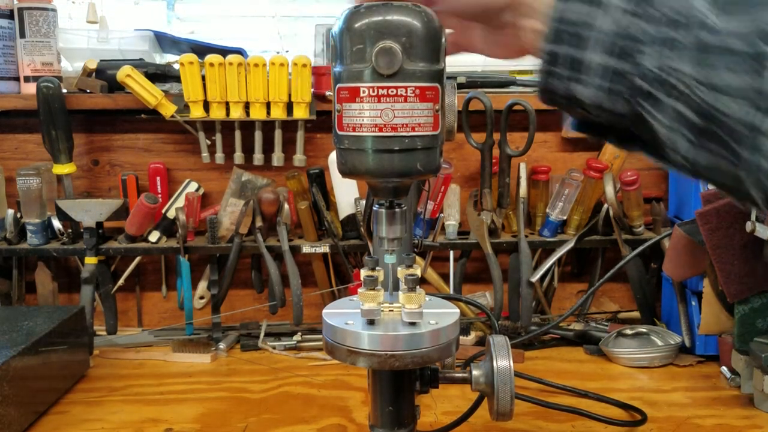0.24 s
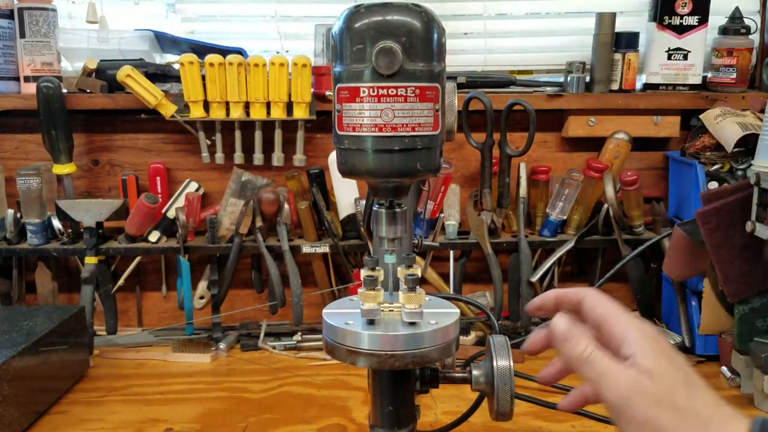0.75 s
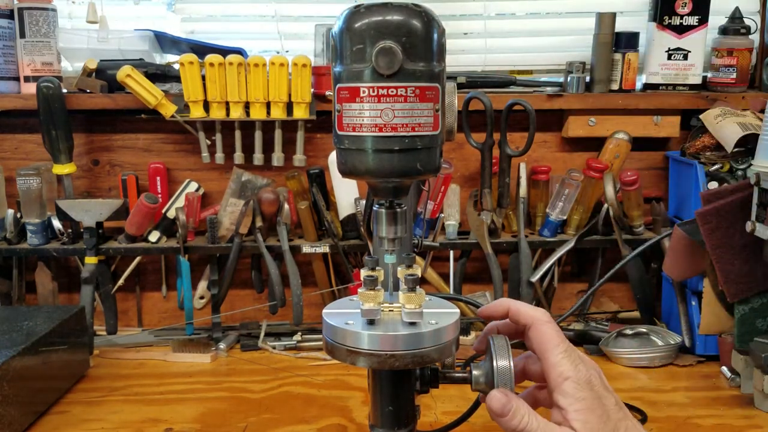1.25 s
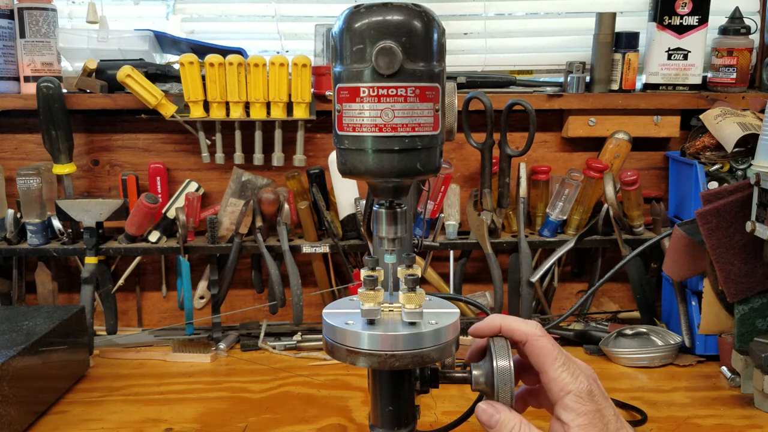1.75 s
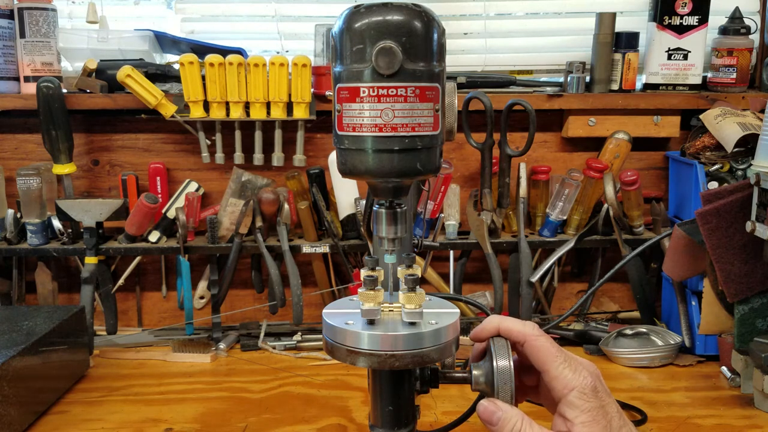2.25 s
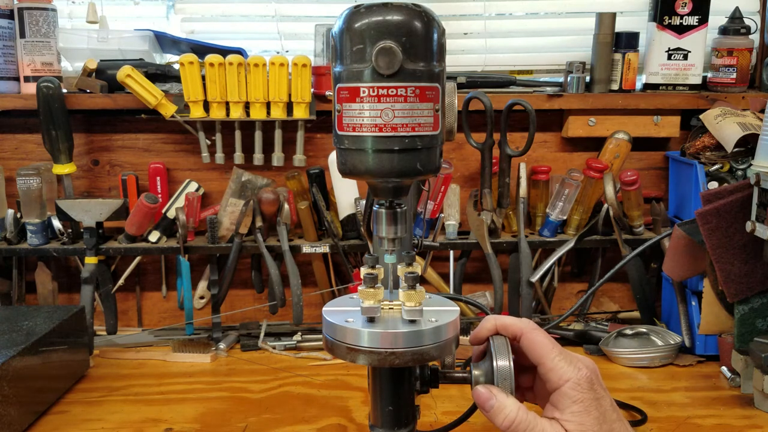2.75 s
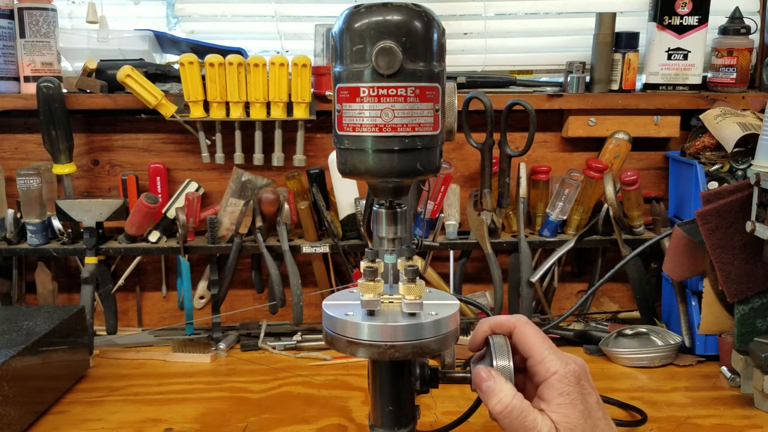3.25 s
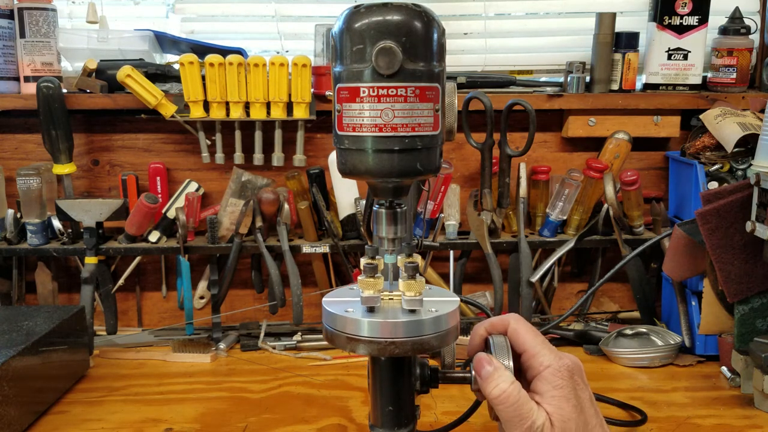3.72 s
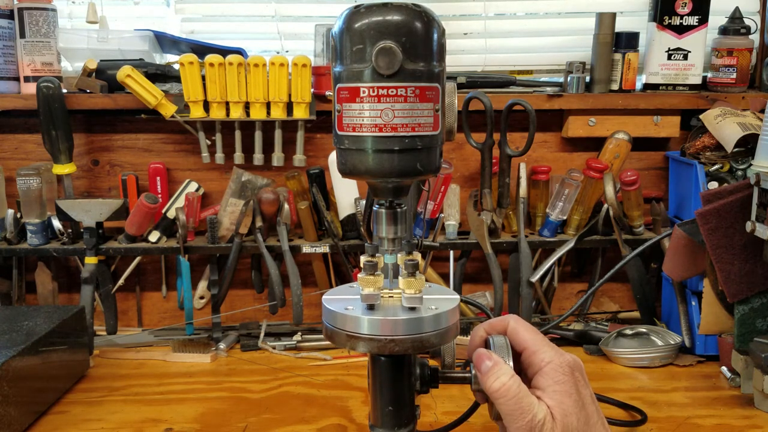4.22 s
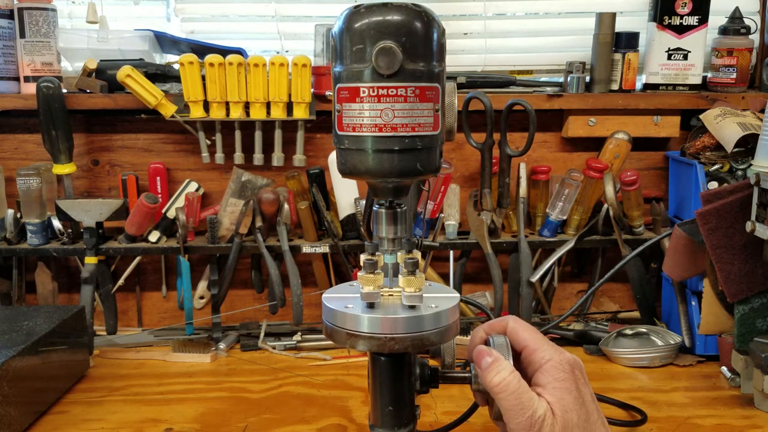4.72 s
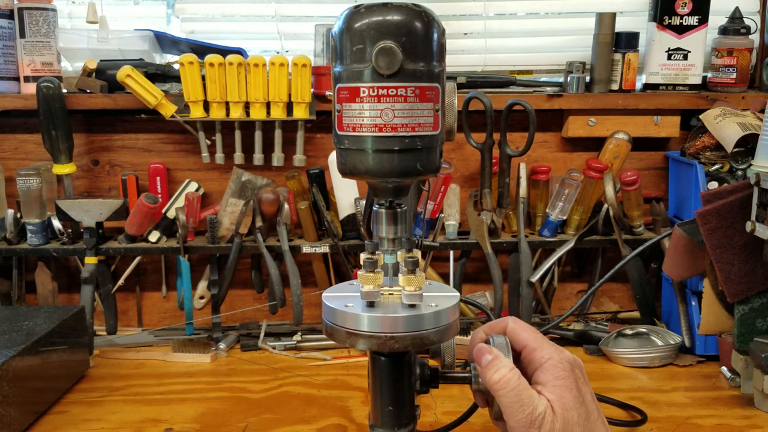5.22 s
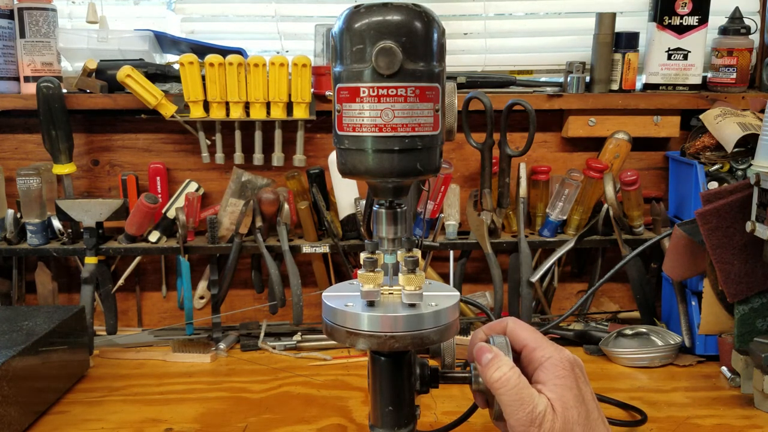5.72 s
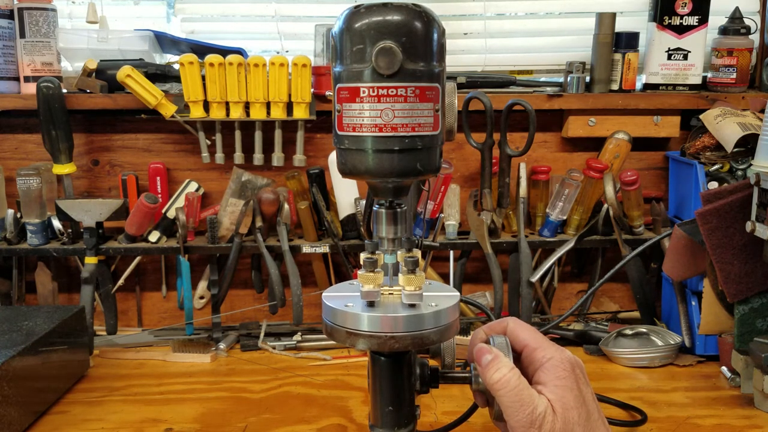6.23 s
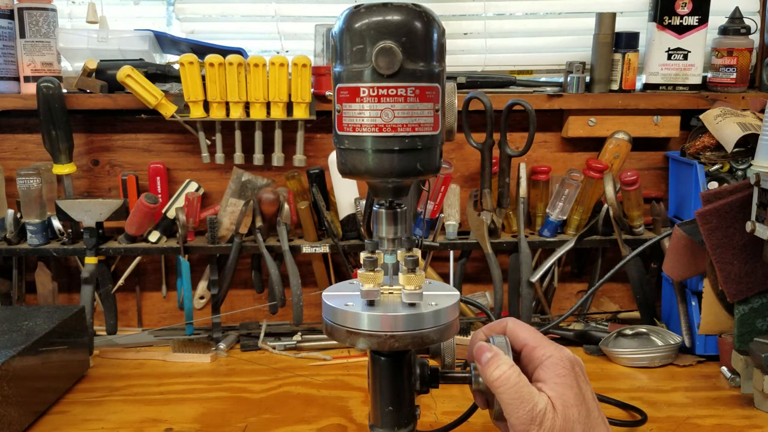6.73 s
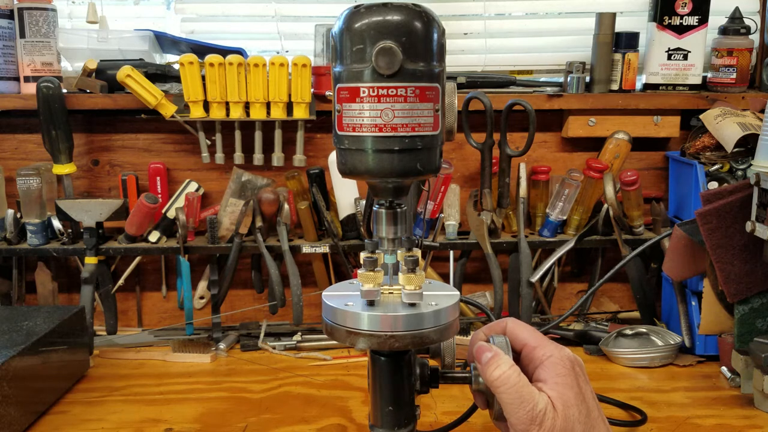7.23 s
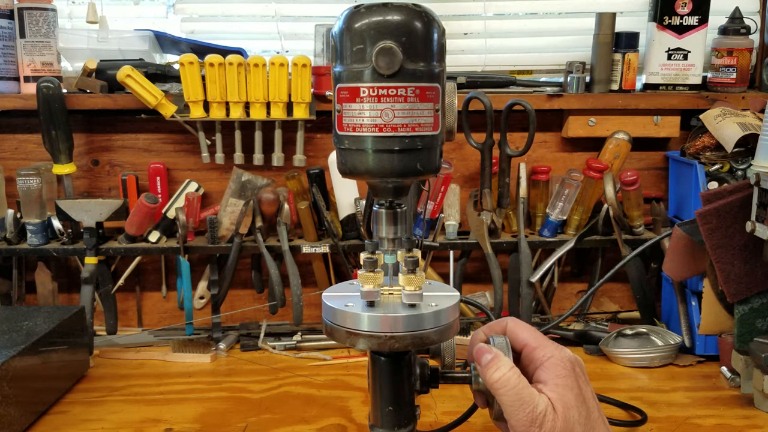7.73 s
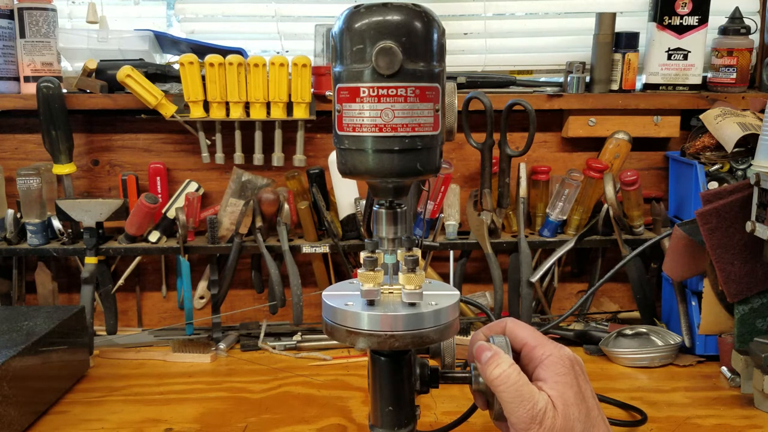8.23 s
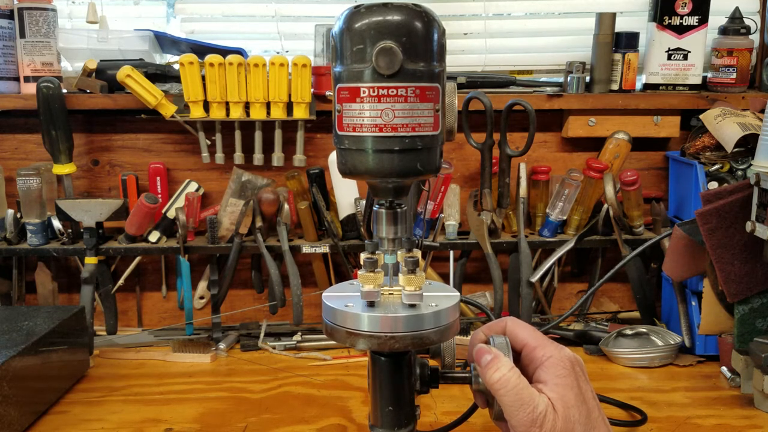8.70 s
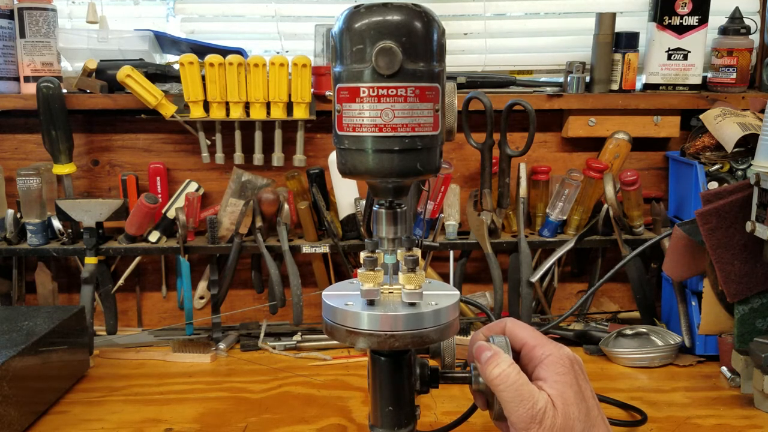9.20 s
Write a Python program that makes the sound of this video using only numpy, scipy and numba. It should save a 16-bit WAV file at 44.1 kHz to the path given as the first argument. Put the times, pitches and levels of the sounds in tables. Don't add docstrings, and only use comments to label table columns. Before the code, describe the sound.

Close stereo sound in a small workshop, with low room rumble underneath. At about 0.06 seconds a switch clicks with a short ring, and a small electric motor starts, its brushes singing thinly. The whine sweeps up rapidly in the first second, then climbs ever more slowly, swelling as it passes through resonances of bench and room. Bearings rattle roughly until around 3 seconds, then smooth out. A dull thud from the feed wheel lands at 1.5. From 3 to 6.6 it runs as a steady, bright whirr of fan tone, growl, air rush and fine hiss. The bit bites metal at about 6.6-6.9, 7.35-7.65, 8.0-8.6 and 9.05-9.6: each time the pitch sags slightly and the table hums in the mid range. Tiny squeals and scrapes flick out near 6.85, 7.3, 7.6 and 8.5. The motor keeps running to the end.

```python
import sys
import numpy as np
from scipy import signal
from scipy.fft import rfft, irfft, next_fast_len
from scipy.io import wavfile
from scipy.ndimage import uniform_filter1d
from numba import njit

SR = 44100
rng = np.random.default_rng(int(sys.argv[2]) if len(sys.argv) > 2 else 0)


def generate_wav(signal):
    frames = np.transpose(np.atleast_2d(signal))
    scaled = np.clip(frames, -1, 1) * 32767
    pcm = np.round(scaled).astype(np.int16)
    wavfile.write(sys.argv[1], SR, pcm)


def linear_from_db(decibels):
    return 10 ** (np.asarray(decibels, float) / 20)


N = 417186
TIME = np.arange(N) / SR
BLOCK = 64
SIZE = next_fast_len(N, True)
HZ = np.arange(SIZE // 2 + 1) * SR / SIZE
TOP_SPEED_HZ, BLADES = 311.434, 6


def walk(rate, size=N):
    hold = int(SR / rate * size / N)
    steps = np.repeat(rng.standard_normal(size // hold + 1), hold)
    return 1.3 * uniform_filter1d(uniform_filter1d(steps, hold), hold)[:size]


def colour(x, points, extra=1):
    hz, *levels_db = np.transpose(points)
    pitch = np.log(HZ + 1)
    curves_db = np.array([np.interp(pitch, np.log(hz), db, left=-150, right=-150) for db in levels_db])
    return irfft(rfft(x, SIZE) * linear_from_db(curves_db) * extra, SIZE)[:, :N] * np.sqrt(SR / 2)


def through(modes, hz):
    f, width, *columns = np.transpose(modes)
    detune = 2 * (hz[::BLOCK] - f[:, None]) / width[:, None]
    lift = np.array(columns) @ (1 / (1 + detune ** 2))
    return [np.interp(TIME, TIME[::BLOCK], v) for v in lift]


def tone(turns, db, pan_db, flutter_db, lead):
    line = np.sin(2 * np.pi * turns + lead * np.array([[.5], [-.5]]))
    pan = linear_from_db(np.array([pan_db, -pan_db]) / 2)
    return np.sqrt(2) * linear_from_db(db + flutter_db * walk(14)) * line * pan


@njit
def partials(turns, orders, gains, starts):
    out = np.zeros(len(turns))
    for k in range(len(orders)):
        for i in range(0, len(turns) - 64, 64):
            step = orders[k] * (turns[i + 64] - turns[i]) / 64
            if step < .45:
                z = gains[k, i >> 6] * np.exp(2j * np.pi * (orders[k] * turns[i] + starts[k]))
                spin = np.exp(2j * np.pi * step)
                for j in range(i, i + 64):
                    out[j] += z.imag
                    z *= spin
    return out


# (speed still missing at the start f/Hz, time constant t/s)
RUN_UP = [
    (43.388, .213),
    (65.234, .755),
    (89.255, 1.743),
]
# (start t/s, end t/s, speed lost in the long run f/Hz)
BRAKING = [
    (6.614, 6.87, 4.833),
    (7.329, 7.593, 10.247),
    (8.107, 8.541, 13.523),
    (9.083, 9.676, 11.608),
]


def shaft():
    inertia_s, press_late_s, press_blur_s = 1.252, .06, .24

    def lag(s):
        return 1 - np.exp(-np.clip(TIME - s, 0, None) / inertia_s)

    lost = sum(hz * (lag(start) - lag(end)) for start, end, hz in BRAKING)
    late = TIME - press_late_s
    press = sum(hz * (late > start) * (late < end) for start, end, hz in BRAKING)
    missing = sum(hz * np.exp(-TIME / s) for hz, s in RUN_UP)
    return TOP_SPEED_HZ - missing - lost, lost, uniform_filter1d(press, int(press_blur_s * SR))


# (f/Hz, width/Hz, level/dB, left minus right level/dB)
BENCH_MODES = [(117, 44.5, -30.7, .3), (178.9, 57.2, -33.3, 2.9), (219.6, 7.6, -12.8, -.5),
               (239.5, 5.2, 1.5, -1.3), (254.2, 6.8, -20.6, 2.9), (302, 11.2, -11.6, 2.4),
               (307.4, 2.3, 2.3, -1.3)]
# (f/Hz, width/Hz, level/dB, left minus right level/dB)
BLADE_MODES = [(687.3, 276.9, -26.6, 3.6), (1110.7, 188.9, -13.8, 1.8), (1417.7, 360.0, -25.8, -21.1),
               (1428.0, 141.3, 18.3, 13.3), (1613.6, 73.4, 8.8, 7.8), (1683.6, 14.0, -4.2, 0.5),
               (1719.6, 188.9, -3.2, 0.0), (1730.9, 12.2, -6.6, 7.9), (1763.8, 11.3, -10.2, -3.4),
               (1836.8, 22.0, -6.7, 3.6), (1844.9, 5.9, -3.3, 1.5), (1847.2, 3.4, -7.4, 11.4),
               (1849.8, 2.4, -0.7, 0.5), (1851.8, 2.4, -0.9, -0.5)]
# (f/Hz, width/Hz, level/dB)
SECOND_MODES = [(1662.9, 221.4, 9.7), (2755.3, 374.3, 13.6), (2872.0, 67.8, -9.7), (3113.8, 54.0, 8.0),
                (3264.4, 84.1, 12.6), (3341.3, 48.6, 6.3), (3545.1, 267.7, 29.1), (3559.7, 383.4, -25.0),
                (3607.3, 35.5, 4.7), (3677.0, 5.0, -3.3), (3703.9, 36.4, 12.2)]
# (f/Hz, width/Hz, level/dB)
THIRD_MODES = [(2804.8, 406.8, 12.7), (4235.5, 118.0, 6.7), (4600.3, 212.2, 15.5), (5068.5, 306.1, 11.6),
               (5323.9, 9.2, -5.8), (5368.7, 35.7, -13.0), (5412.4, 34.9, -12.0), (5421.6, 339.9, 30.0),
               (5499.7, 32.9, 10.6), (5501.3, 52.5, -11.6), (5535.8, 15.3, -4.0)]
# (f/Hz, width/Hz, level/dB)
GROWL_MODES = [(1005.8, 469.8, -29.9), (1554.3, 469.8, -29.7), (2043.6, 469.8, -26.9), (2209.1, 26.8, -8.1),
               (2299.5, 83.5, -15.6), (2415.3, 13.9, -22.8), (2415.5, 10.1, 18.2)]
# (f/Hz, width/Hz, level/dB)
WHINE_MODES = [(12950.7, 48.3, 17.0), (12956.4, 100.4, -15.3), (12961.4, 17.0, -6.5),
               (13023.4, 1022.7, 30.0), (13029.9, 17.0, -5.1), (13060.5, 28.8, 14.1),
               (13061.8, 50.9, -15.7), (13095.1, 105.2, -2.7)]


def strong_lines(turns, hz, lost, press):
    growl_order, whine_order = 7.83, 42.41
    second, third = 2 * BLADES, 3 * BLADES
    rotor_db, rotor_pan = through(BENCH_MODES, hz)
    blade_db, blade_pan = through(BLADE_MODES, BLADES * hz)
    second_db = through(SECOND_MODES, second * hz)[0]
    third_db = through(THIRD_MODES, third * hz)[0]
    growl_db = through(GROWL_MODES, growl_order * hz)[0]
    whine_db = through(WHINE_MODES, whine_order * hz)[0]
    flat = np.ones(N)
    rotor = tone(turns, rotor_db - 23.5 - .37 * press, rotor_pan - 3.2 + 0.14 * press, 0.39, 0.06)
    fan = tone(BLADES * turns, blade_db - 17.5, blade_pan + 4, 0.38, -0.9)
    fan += tone(second * turns, second_db - 44.5, -2.5 * flat, 0.88, 1.0)
    fan += tone(third * turns, third_db - 62.5, -2.1 * flat, 2.5, 0.41)
    growl = tone(growl_order * turns, growl_db - 18.5, .4 * flat, 0.45, 0.37)
    whine = tone(whine_order * turns, whine_db - 59.5 + 1.2 * lost, 14 * flat, 3.3, -1.7)
    return rotor + fan + growl + whine


# (f/Hz, phase/rad)
PORT_LEAD = [(0, -5), (860, 1.22), (1890, 0.45), (2410, 0.55), (4220, 1.09), (6030, 2), (6700, 1.9),
             (7060, 4), (7670, 7.5), (9820, 10), (12900, 10.5), (14500, 11.5), (15800, 4)]


def echoes(t60_s, wet_db):
    s = TIME[:SR // 4]
    tail = rng.standard_normal((2, len(s))) * linear_from_db(-60 * s / t60_s) * (s > .001)
    tail *= linear_from_db(wet_db) / np.sqrt(np.sum(tail ** 2, axis=1, keepdims=True))
    tail[:, 0] = 1
    lead = np.interp(HZ, *np.transpose(PORT_LEAD)) * np.array([[.5], [-.5]])
    return rfft(tail, SIZE) * np.exp(1j * lead) / np.sqrt(1 + linear_from_db(2 * wet_db))


# (multiple of shaft speed, level over
# the hiss/dB)
WHOLE_LINES = [(23, 8.0), (24, 14.0), (30, 6.0), (36, 12.0), (42, 9.0), (48, 9.0), (49, 10.0), (50, 9.0),
               (51, 6.0)]
# (multiple of shaft speed, level over the hiss/dB)
BEARING_LINES = [(13.75, 8), (14.49, 12), (18.64, 8), (19.05, 8), (19.77, 6), (20.81, 11), (21.04, 3),
                 (21.55, 12), (22.29, 11), (22.89, 8), (25.08, 7), (25.51, 5), (26.24, 5), (29.48, 3),
                 (31.4, 9), (32.14, 15), (34.93, 10), (35.67, 13),
                 (37.37, 9.0), (38.46, 13.0), (39.19, 12.0), (40.45, 11.0), (41.21, 7.0), (41.7, 7.0),
                 (43.68, 8.0), (44.93, 10.0), (45.65, 15.0), (46.03, 9.0), (46.92, 8.0), (47.05, 15.0),
                 (48.17, 11.0), (48.89, 16.0), (50.15, 6.0), (50.88, 10.0), (51.41, 14.0), (52.14, 17.0),
                 (52.73, 11.0), (53.73, 8.0), (54.65, 10.0), (55.35, 13.0), (56.59, 9.0), (57.87, 7.0),
                 (58.55, 12.0), (60.38, 8.0), (61.1, 14.0), (62.39, 18.0)]
# (multiple of shaft speed, level over the hiss/dB)
SETTLING_LINES = [(2.12, 9), (4, 10), (5.39, 13), (9.34, 6), (9.82, 12), (10.06, 12), (10.22, 15),
                  (10.59, 15), (10.96, 6), (12.41, 5), (12.58, 11), (13.3, 18), (14.25, 8), (15.81, 11),
                  (16.64, 9), (17.25, 11), (21.55, 15), (22, 11), (25.51, 18), (25.86, 11), (26.24, 13),
                  (27.5, 9), (28.72, 16), (29.69, 10), (32.75, 13), (42.75, 12), (46.25, 11),
                  (53.38, 13), (54.72, 14), (56.69, 16), (59.94, 17), (61.94, 18), (63.25, 18), (65.12, 20),
           (67.62, 20), (68.38, 22), (70.19, 26), (71.62, 22), (73.06, 22), (74.88, 28)]
# (f/Hz, width/Hz, level/dB)
SPINDLE = [(1140, 32, 10), (2680, 230, 6.5), (2864, 140, 13.5), (6130, 590, 2.5), (6524, 118, 11),
           (4620, 99, 0), (8870, 280, 5), (4300, 190, 7), (13150, 430, 5)]
# (f/Hz, width/Hz, level/dB)
SHELL = [(627, 59, 10), (850, 27, 7.5), (973, 23, 5.5), (1032, 15, 5.5), (1208, 29, 6), (1618, 15.4, 12.5),
         (3016, 51, 0), (6440, 900, -1.5), (13240, 430, 3)]
# (f/Hz, left level/dB, right level/dB)
ROAR_PATH = [(148, -97, -94), (320, -86.5, -70.5), (440, -71, -71.5), (415, -68, -65), (580, -74.5, -67),
             (785, -64, -55.5), (845, -58.5, -53.5), (1014, -48.5, -50), (1122, -59.5, -57.5),
             (1480, -56.5, -61), (1720, -65, -60.5), (2440, -65, -66), (2740, -63, -59.5)]
# (f/Hz, left level/dB, right level/dB)
HISS_PATH = [(3460, -71.5, -68.5), (4200, -76.5, -68), (4280, -72.5, -71.5), (5600, -76.5, -64.5),
             (5400, -62, -70.5), (6430, -79, -70.5), (6930, -75, -72), (7230, -69, -81), (9050, -69, -63),
             (9600, -84, -71.5), (10800, -66.5, -66.5), (12300, -69, -67), (12540, -59, -72),
             (16000, -65.5, -78)]


def housing(turns, hz):
    grease_s, wake_s = 2.84, .42
    slow_time, slow_hz = TIME[::BLOCK], hz[::BLOCK]
    decades = np.log10(hz / TOP_SPEED_HZ)
    stiff = np.exp(-(TIME / grease_s) ** 2)
    slow_stiff = stiff[::BLOCK]
    asleep = np.exp(-(slow_time / wake_s) ** 4)
    roar_db = -0.28 + 33 * decades
    hiss_db = 0.5 + 22.5 * decades - 1.5 * stiff

    steady = WHOLE_LINES + BEARING_LINES
    orders, over_db = np.transpose(steady + SETTLING_LINES)
    waver_db = 3.6 * np.array([walk(4, size=len(slow_hz)) for _ in orders])
    waver_db[:len(steady)] += -.7 - 3.3 * slow_stiff
    waver_db[len(steady):] += -20 + 19 * slow_stiff - 8 * asleep
    for f, width, db in SPINDLE:
        detune = 2 * (orders[:, None] * slow_hz - f) / width
        waver_db += db / (1 + detune ** 2)
    over_db = over_db - .6 * np.clip(orders - 50, 0, None)
    gains = linear_from_db(over_db[:, None] + waver_db) * np.sqrt(slow_hz / 5 / SR)
    lines = partials(turns, orders, gains, rng.random(len(orders)))

    shared, apart = rng.standard_normal(N), rng.standard_normal((2, N))
    shell = 1 + sum((linear_from_db(db) - 1) / (1 + 2j * (HZ - f) / width) for f, width, db in SHELL)
    path = shell * echoes(0.11, -8)
    air = 1.01 * shared + 0.34 * apart
    roar = linear_from_db(roar_db + 0.067 * walk(5)) * (lines + air)
    rolling = .6 * shared + .5 * apart
    hiss = linear_from_db(hiss_db + .6 * walk(7)) * (lines + rolling)
    seam = [HISS_PATH[0]]
    return colour(roar, ROAR_PATH + seam, path) + colour(hiss, HISS_PATH, path)


# (start t/s, end t/s, hum level/dB, overtone level/dB)
BITES = [
    (6.624, 6.92, -34, -46),
    (7.35, 7.658, -30.5, -35),
    (8.02, 8.598, -32.5, -32.5),
    (9.053, 9.595, -36, -38.5),
]


def bites():
    table_hz = 610.5
    hum_db = np.full((2, N), -90.)
    for start, end, *db in BITES:
        hum_db[:, int(start * SR):int(end * SR)] = np.array(db)[:, None]
    first, second = uniform_filter1d(linear_from_db(hum_db + 1.0 * walk(11)), SR // 12) * np.sqrt(2)
    angle = 2 * np.pi * table_hz * TIME + 0.14 * walk(8)
    lag = np.array([[0], [2.2]])
    hum = first * np.sin(angle - lag) * linear_from_db(np.array([[-1.5], [1.5]]))
    return hum + second * np.sin(2 * angle)


# (t/s, length t/s, squeal f/Hz, squeal level/dB, scrape level/dB)
CATCHES = [
    (6.85, 0.03, 4620, -29, -24.5),
    (7.298, 0.044, 8100, -28, -36),
    (7.58, 0.044, 4700, -35, -24.5),
    (8.533, 0.04, 4580, -43, -28),
]


def catches():
    out, age = np.zeros(N), TIME[:SR // 4]
    band = signal.butter(2, (4200, 10500), "bandpass", fs=SR, output="sos")
    for s, length, hz, db, scrape_db in CATCHES:
        swell = np.sin(np.pi * np.clip(age / length, 0, 1))
        overtone = 0.46 * np.sin(4 * np.pi * hz * age) * (hz < 6000)
        squeal = np.sin(2 * np.pi * hz * age) + overtone
        scrape = signal.sosfilt(band, rng.standard_normal(len(age)))
        out[int(s * SR):][:len(age)] += swell * (linear_from_db(db) * squeal + linear_from_db(scrape_db) * scrape)
    return out


# (t/s, f/Hz, level/dB, t60 t/s)
KNOCKS = [
    (.065, 1640, -21.5, 0.3),
    (.06, 520, -33, 0.39),
    (1.487, 210, -14.5, 0.054),
    (1.85, 330, -46, .05),
]


def knocks():
    out, age = np.zeros(N), TIME[:SR // 4]
    for s, hz, db, t60_s in KNOCKS:
        onset = np.minimum(age * hz / 8, 1)
        ring = linear_from_db(db - 60 * age / t60_s) * np.sin(2 * np.pi * hz * age)
        out[int(s * SR):][:len(age)] += onset * ring
    return out


def brushes():
    fade_db = 4.5 * TIME
    rough = walk(220) * np.sin(2 * np.pi * 6510 * TIME)
    return linear_from_db(-41.5 - fade_db) * rough * linear_from_db(np.array([[-2.5], [1.5]]))


# (t/s, level/dB)
RUMBLE = [(0, -2), (2, -3), (4, -1.5), (6, -0.5), (8, 0.5), (9.46, 1.5)]
# (f/Hz, level/dB)
ROOM_HUM = [(25, -82), (45, -79.5), (60, -78.5), (78, -71), (100, -76), (125, -78.5), (200, -75),
            (400, -82)]


def workshop():
    swell_db = np.interp(TIME, *np.transpose(RUMBLE))
    noise = rng.standard_normal(N) + 0.19 * rng.standard_normal((2, N))
    return colour(noise * linear_from_db(swell_db), ROOM_HUM) * linear_from_db(np.array([[-.8], [.8]]))


def scene():
    hz, lost, press = shaft()
    turns = np.cumsum(hz + .07 * walk(12)) / SR
    machine = strong_lines(turns, hz, lost, press) + housing(turns, hz)
    return machine + bites() + catches() + knocks() + brushes() + workshop()


def low_pass(x):
    return signal.sosfilt(signal.butter(12, 15730, fs=SR, output="sos"), x)


def record(dry):
    return low_pass(dry)


dry = scene()
out = record(dry)
generate_wav(out)
```